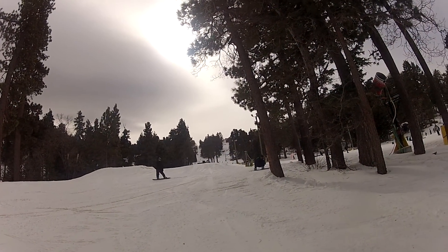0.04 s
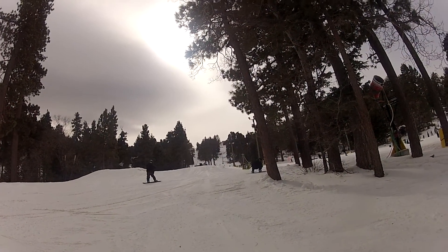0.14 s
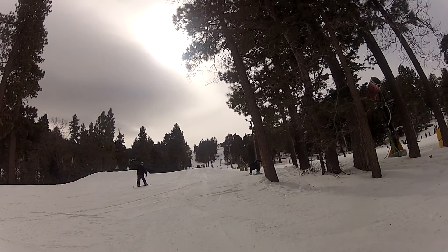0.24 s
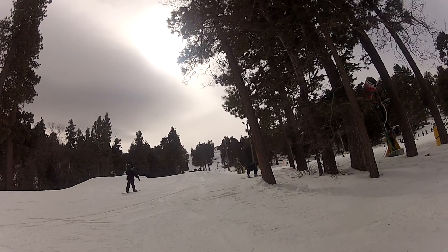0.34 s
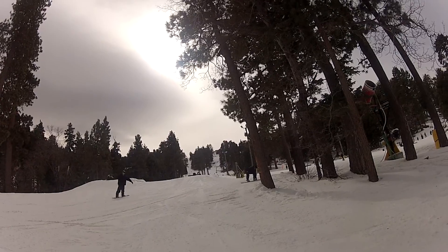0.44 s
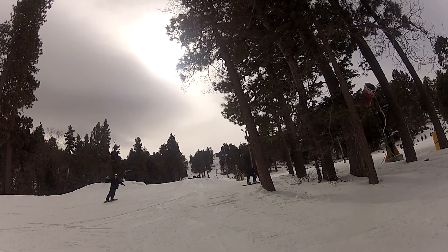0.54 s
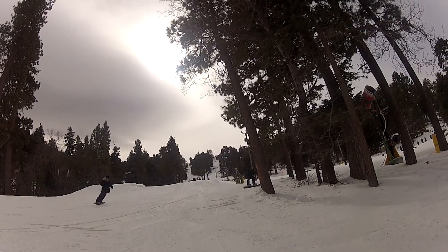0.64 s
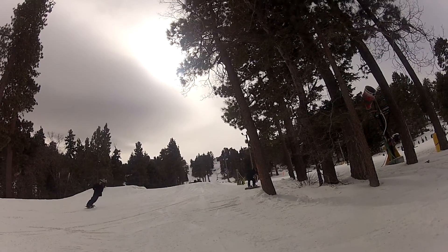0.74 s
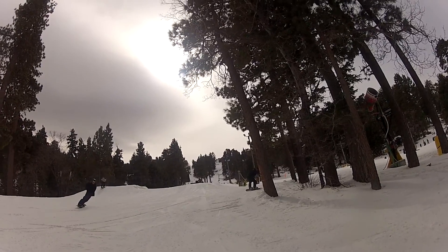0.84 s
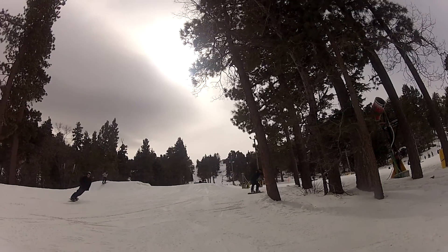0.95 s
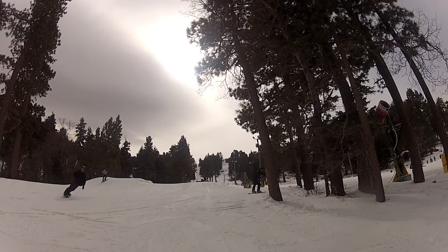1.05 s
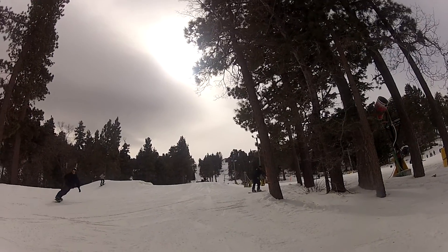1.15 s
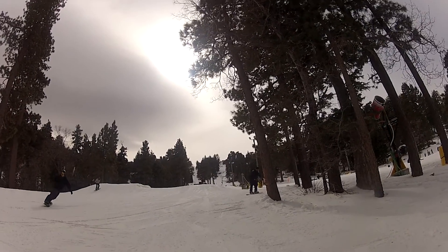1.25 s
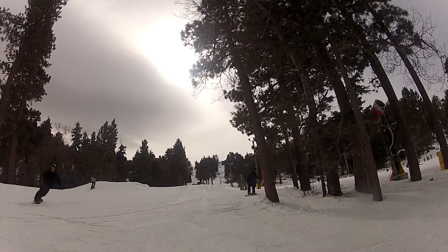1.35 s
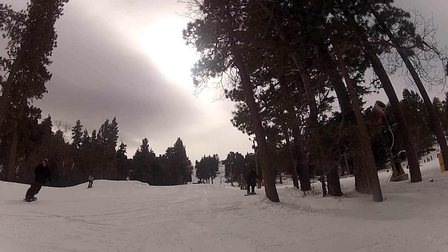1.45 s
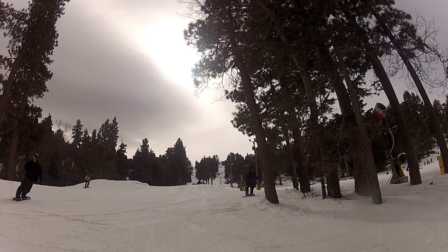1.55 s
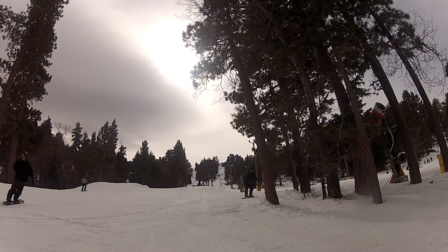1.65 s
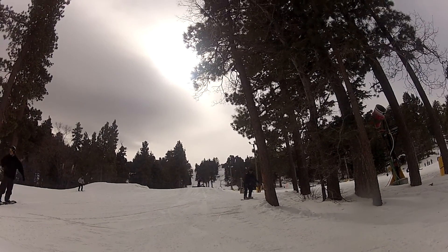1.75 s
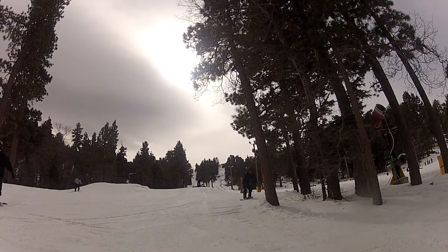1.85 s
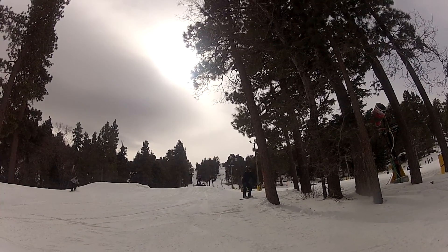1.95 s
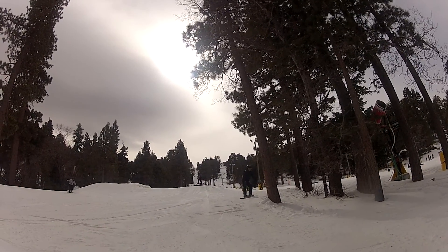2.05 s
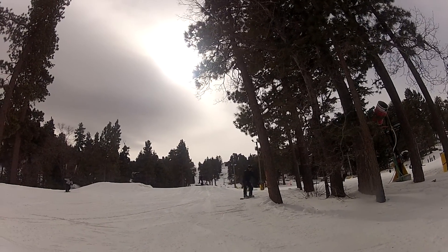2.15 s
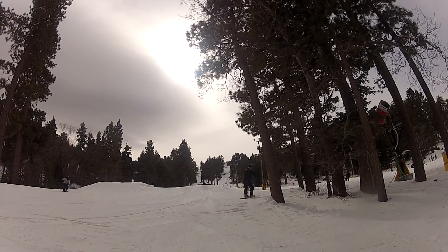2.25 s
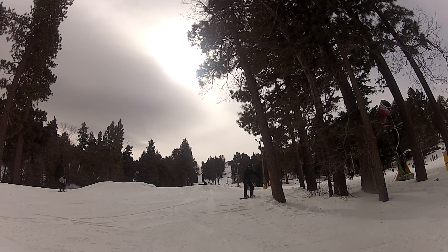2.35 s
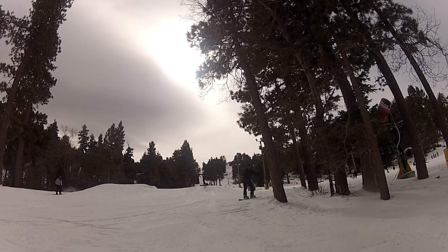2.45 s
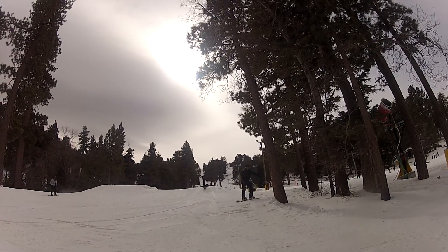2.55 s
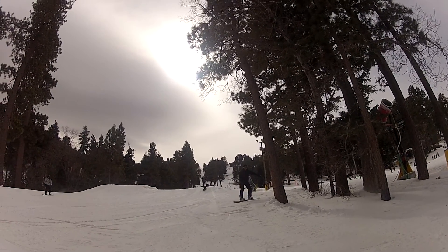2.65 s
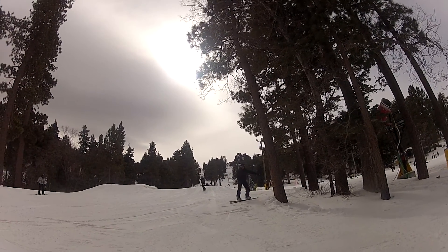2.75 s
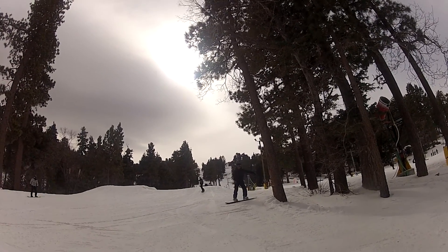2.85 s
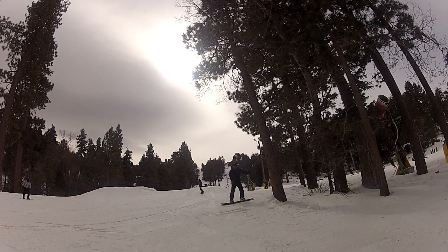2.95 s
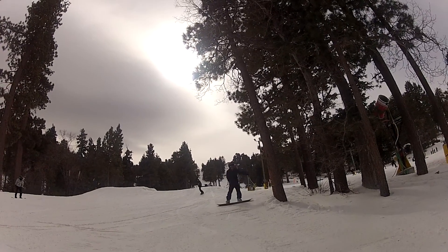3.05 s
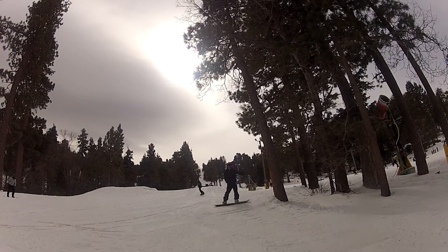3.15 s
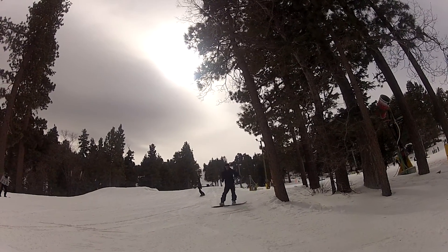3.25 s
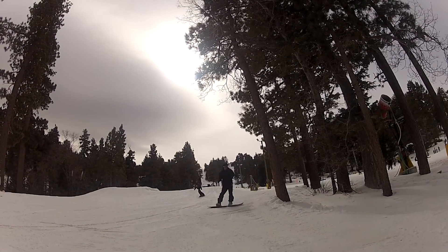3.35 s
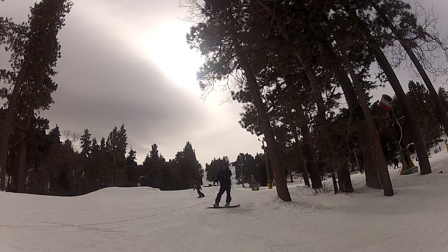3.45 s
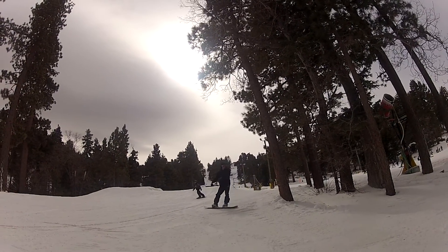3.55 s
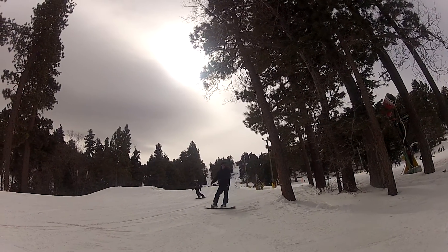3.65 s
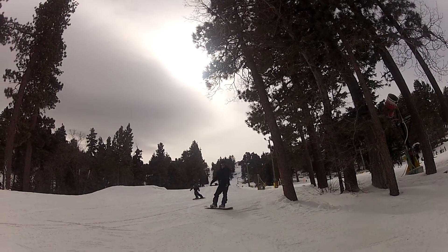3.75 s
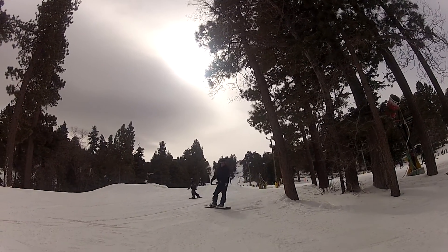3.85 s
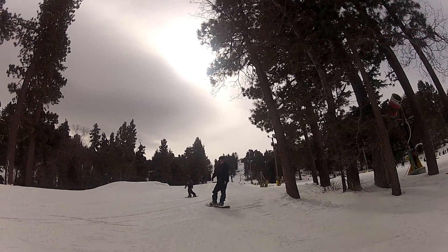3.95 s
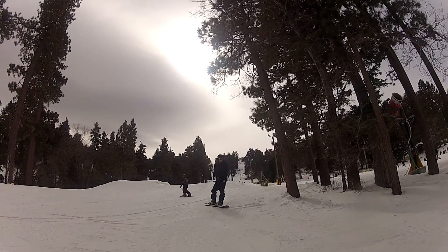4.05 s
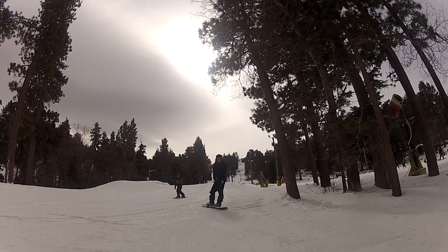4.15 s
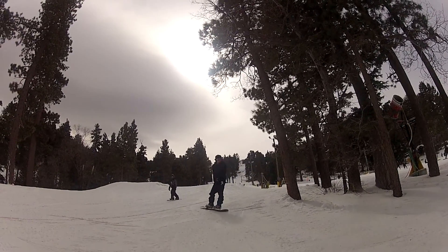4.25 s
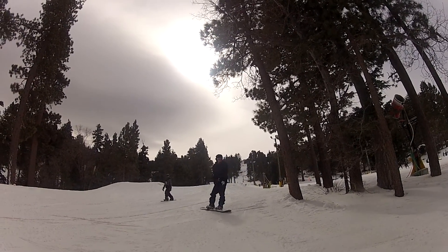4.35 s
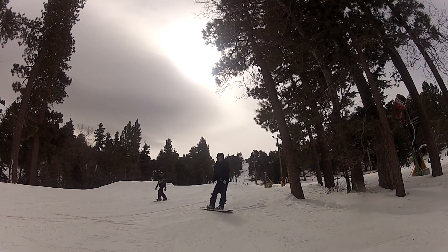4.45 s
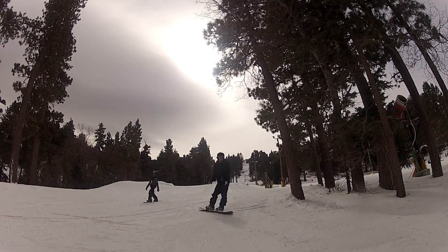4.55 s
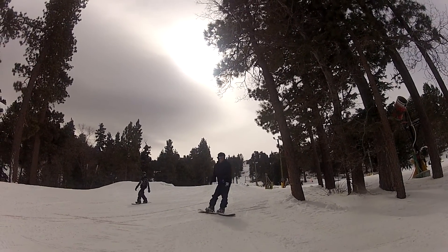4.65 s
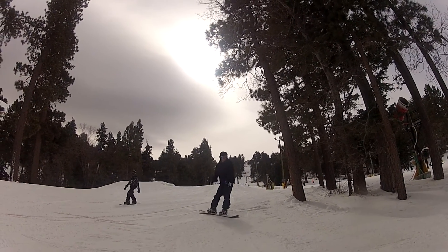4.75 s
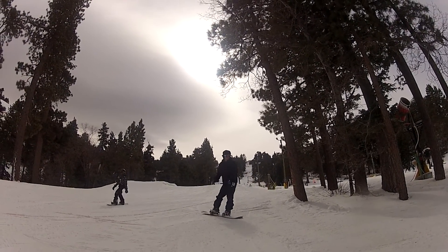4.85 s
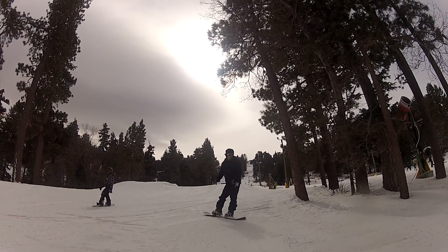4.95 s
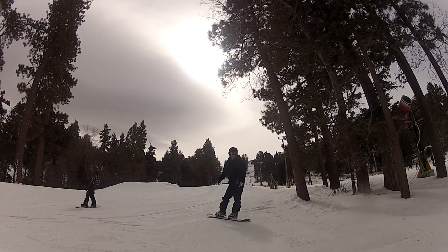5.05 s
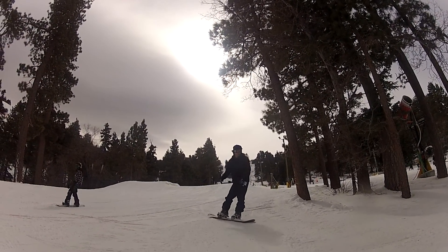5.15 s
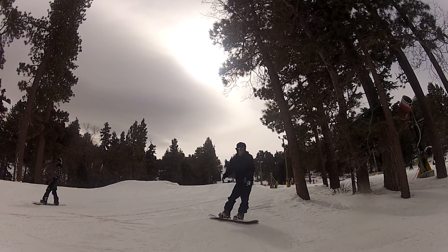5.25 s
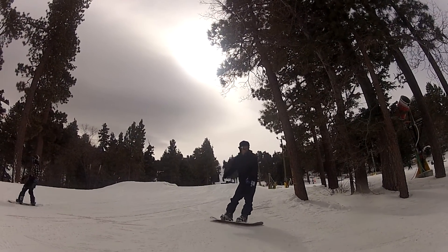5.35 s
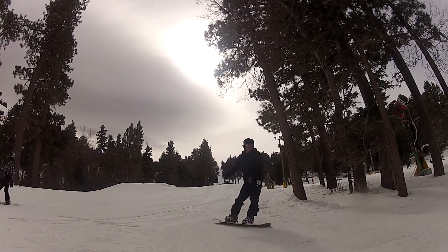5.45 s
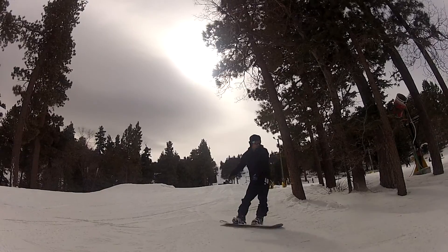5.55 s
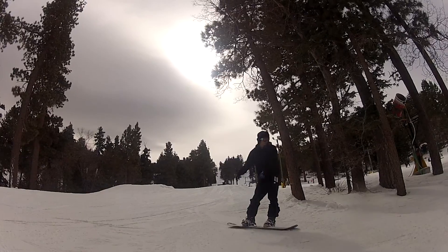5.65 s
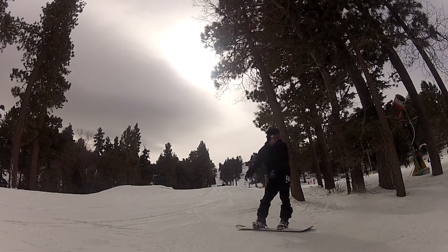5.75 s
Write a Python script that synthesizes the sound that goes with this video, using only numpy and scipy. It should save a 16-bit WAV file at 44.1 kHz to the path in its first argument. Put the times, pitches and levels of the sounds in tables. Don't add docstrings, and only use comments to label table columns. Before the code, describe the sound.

A small sealed camera on a snowy run picks up rubbing and hollow plastic knocks in the first second and a half, the hardest near one second. Then thin snowboard hiss with small crust snaps and icy ticks grows, peaks just before four seconds, and drops to faint flecks, a soft knock and a tiny squeak. Outdoors, dry, boxy and muffled, with a low-grade brittle top.

```python
import sys
import numpy as np
from scipy import signal
from scipy.fft import rfft, irfft
from scipy.io import wavfile
from scipy.ndimage import uniform_filter1d

SR = 44100
rng = np.random.default_rng(int(sys.argv[2]) if len(sys.argv) > 2 else 0)


def transcribe(u):
    v = np.clip(np.atleast_2d(u).T, -1, 1)
    q = np.round(v * 32767).astype(np.int16)
    wavfile.write(sys.argv[1], SR, q)


def amplitude_ratio(level_db):
    exponent = np.asarray(level_db, float) / 20
    return 10 ** exponent


N = 255780

# (frequency [Hz], level [dB], t60 [s])
SHELL_MODES = [(720, 4, 0.037), (835, 8.5, 0.027), (962, 5.5, 0.033), (1112, 6.5, 0.037),
               (1245, 10.5, 0.029), (1370, 6, 0.033), (1454, 1, 0.052), (1560, -13, 0.035)]
# (frequency [Hz], width [Hz], level [dB])
LOWER_PORT_MODES = [(1960, 120, 0), (2130, 170, -7)]
# (frequency [Hz], width [Hz], level [dB])
UPPER_PORT_MODES = [(2430, 170, -5), (2680, 150, -8), (3060, 200, 0), (3480, 260, -6)]
# (frequency [Hz], width [Hz], level [dB])
TOP_PORT_MODES = [(4050, 280, -3), (4850, 320, 0), (5330, 340, 0)]
# (time [s], peak [dB], pitch [Hz], top port re peak [dB])
CRUST_SNAPS = [(0.8818, -51, 1800, -3), (1.0904, -56, 2050, -21), (1.764, -55, 3170, -12),
               (1.895, -55, 1970, -25), (2.2139, -54, 2070, -17), (2.2897, -53, 2050, -13),
               (2.4095, -50, 1860, -9), (2.447, -51, 3350, -7), (2.4806, -49.5, 1900, -13),
               (2.6495, -49.5, 2680, -19), (2.7186, -47, 1830, -20), (2.733, -52, 3320, -22),
               (2.894, -49.5, 3060, -16), (3.082, -55, 2670, -5), (3.1772, -54, 1990, 0),
               (3.208, -52, 1970, -4), (3.283, -48.5, 3080, -11), (2.53, -51.5, 1940, -13),
               (3.415, -52.5, 1980, -22), (3.582, -57, 1940, -24), (3.6331, -60, 1980, -17),
               (3.8305, -47, 2080, -25), (3.9464, -51, 3040, -25), (4.064, -49, 3000, -16),
               (4.4096, -63, 2760, -28), (4.892, -56, 2700, -20), (4.956, -52, 2690, -19)]


def rms_one(x):
    return x / np.sqrt(np.mean(x ** 2) + 1e-20)


def in_time(table):
    s, *columns = np.transpose(table)
    return [np.interp(np.arange(N) / SR, s, c) for c in columns]


def swells(rows, *rest_db):
    t = np.arange(0, N, 64) / SR
    s, length_s, *columns = np.transpose(rows)
    offset = (t[:, None] - s) / np.maximum(length_s, 0.01)
    bells = np.exp(-4 * np.log(2) * offset ** 2) ** 2
    curves = []
    for db, rest in zip(columns, rest_db):
        power = bells @ amplitude_ratio(db) ** 2 + amplitude_ratio(rest) ** 2
        curves.append(np.interp(np.arange(N) / SR, t, 10 * np.log10(power)))
    return curves


def drift(rate_hz):
    r = np.exp(-2 * np.pi * rate_hz * 40 / SR)
    white = rng.standard_normal(N // 40 + 2002)
    slow = signal.lfilter([1], [1, -2 * r, r * r], white)[2000:]
    return np.interp(np.arange(N) / 40, np.arange(len(slow)), rms_one(slow))


def ring(force, modes):
    out = 0
    for hz, db, t60_s in modes:
        r, w = amplitude_ratio(-60 / (t60_s * SR)), 2 * np.pi * hz / SR
        rise, decay = [0, amplitude_ratio(db) * np.sin(w)], [1, -2 * r * np.cos(w), r * r]
        out = out + signal.lfilter(rise, decay, force + 1e-18)
    return out


def peak(x, hz, width_hz):
    r = np.exp(-np.pi * width_hz / SR)
    poles = [1, -2 * r * np.cos(2 * np.pi * hz / SR), r * r]
    return signal.lfilter([(1 - r * r) / 2, 0, (r * r - 1) / 2], poles, x)


def steep(x, hz, width_hz):
    return peak(peak(x, hz, width_hz * 1.55), hz, width_hz * 1.55)


def coloured(points):
    hz, db = np.transpose(points)
    bins_hz = np.arange(N // 2 + 1) * SR / N
    shape = amplitude_ratio(np.interp(np.log(bins_hz + 1), np.log(hz), db))
    return rms_one(irfft(rfft(rng.standard_normal(N)) * shape, N))


def evened(x, span_s, share):
    swell = np.sqrt(uniform_filter1d(x ** 2, int(span_s * SR)) + 1e-12)
    return rms_one(x / swell ** np.clip(share, 0, 1))


def burst(s, length_s, noise):
    decay = np.exp(-np.arange(len(noise)) / SR / max(length_s, 3e-4))
    return round(s * SR), np.r_[2.5, noise[1:]] * decay


def soft(contact_s):
    t = np.arange(1500) / SR / max(contact_s, 5e-5)
    force = t * t * np.exp(-t)
    return force / np.sum(force)


def air():
    # (frequency [Hz], density [dB per Hz])
    air_spectrum = [(60, -8), (150, -6), (300, -7), (600, -16.5), (1000, -20), (1700, -23.5), (3000, -24),
                    (4200, -25), (5500, -28)]
    return amplitude_ratio(-61) * coloured(air_spectrum)


def channel_hiss():
    # (frequency [Hz], density [dB per Hz])
    hiss_spectrum = [(24, -37), (40, -10), (130, -3.5), (680, -14), (3640, -16.5), (5220, -18.5),
                     (5990, -31), (7010, -20), (9000, -25), (11700, -63), (19800, -120)]
    return amplitude_ratio(-77) * coloured(hiss_spectrum)


def handling():
    # (centre [s], length [s], peak [dB])
    gust_rows = [(.09, 0.13, -50.5), (.25, .05, -56), (.52, 0.064, -54), (.62, 0.077, -47.5),
                 (.84, 0.21, -50), (1.0, 0.17, -44), (1.18, 0.053, -48.5), (1.29, 0.11, -46.5),
                 (1.43, 0.043, -55), (1.56, 0.19, -48), (1.81, 0.044, -53), (1.93, 0.25, -54),
                 (2.19, 0.078, -48.5), (2.38, 0.37, -55), (2.82, 0.21, -50), (3.1, .12, -57),
                 (3.24, 0.26, -57), (3.62, 0.038, -48.5), (3.78, 0.05, -47), (3.86, 0.082, -50.5),
                 (4.01, 0.058, -59), (4.42, 0.39, -54), (4.55, 0.05, -50), (4.76, 0.16, -48),
                 (5.0, 0.28, -58.5), (5.24, 0.37, -54), (5.38, 0.12, -50), (5.68, 0.37, -56)]
    # (centre [s], length [s], low wall [dB], upper wall [dB])
    rub_rows = [(.1, 0.19, -70, -64), (.21, 0.041, -54, -65), (.28, 0.071, -54, -59), (.37, 0.1, -50, -54),
                (.57, 0.049, -47.5, -75), (.7, 0.21, -48, -58), (.8, 0.11, -66, -57),
                (.91, 0.08, -63, -45.5), (.99, 0.29, -48, -76), (1.13, 0.042, -46.5, -63),
                (1.23, 0.056, -56, -67), (1.29, 0.036, -51.5, -52.5), (1.48, 0.053, -56, -53),
                (1.57, 0.049, -47.5, -48), (2.19, 0.092, -52.5, -57), (2.3, 0.086, -57.5, -52.5),
                (2.4, 0.21, -56, -57), (2.68, 0.41, -72, -58), (3.12, 0.11, -70, -54.5),
                (3.24, 0.11, -60, -57.5), (3.45, 0.45, -60.5, -64.5), (3.62, 0.046, -60, -76),
                (3.78, 0.077, -64, -66), (3.82, 0.32, -78, -57.5), (4.48, 0.04, -58, -71),
                (4.74, 0.14, -62, -74), (4.92, 0.086, -72, -58.5), (5.26, 0.22, -61.5, -76),
                (5.4, 0.22, -60, -71)]
    sway_db, = swells(gust_rows, -60.5)
    low_db, upper_db = swells(rub_rows, -67, -75)
    rustle_db = 10 * np.log10(amplitude_ratio(upper_db - 10) ** 2 + amplitude_ratio(-71) ** 2)
    white = rng.standard_normal((3, N))
    sway = evened(steep(white[0], hz=31.6, width_hz=16.0), span_s=0.088, share=0.57)
    lumps = white[1] * amplitude_ratio(5.5 * drift(rate_hz=14.4))
    low = evened(steep(lumps, hz=140.3, width_hz=61.4), span_s=0.062, share=1.0)
    upper = steep(lumps, hz=216.6, width_hz=66) + 0.5 * steep(lumps, hz=352, width_hz=72)
    upper = evened(upper, span_s=0.019, share=0.34)
    rustle = rms_one(ring(white[2] * amplitude_ratio(2.5 * drift(rate_hz=40)), SHELL_MODES))
    walls = amplitude_ratio(low_db - 4.0) * low + amplitude_ratio(upper_db - 7.0) * upper
    return amplitude_ratio(sway_db) * sway + walls + amplitude_ratio(rustle_db - 7.0) * rustle


def board():
    # (time [s], edge pressure [dB], lower port re pressure as the base turns away [dB])
    edge_rows = [(0, -73, -4), (.1, -62.5, -6), (.3, -83, 12.5), (.6, -89, 8), (.75, -71.5, 0.5),
                 (1.3, -63, -5.5), (1.74, -71, -4.5), (1.88, -64, -4), (2.12, -65.5, 0), (2.3, -61, -5.5),
                 (2.6, -61.5, -4), (3.572, -59.5, -10), (3.586, -58.5, -4), (3.94, -48, -7.5),
                 (4.095, -51.5, -8.5), (4.125, -65, -5), (5.0, -68.5, -5.5), (5.8, -61, -8.5)]
    spray_s, spray_re_snap_db = 0.099, -15.5
    edge_db, lower_db = in_time(edge_rows)
    spray_db, = swells([(s, spray_s, db + spray_re_snap_db) for s, db, *_ in CRUST_SNAPS], -100)
    press_db = 10 * np.log10(amplitude_ratio(edge_db) ** 2 + amplitude_ratio(spray_db) ** 2)
    top_db = -8.5 - 0.1 * (press_db + 72)
    chatter = 2.26 * drift(rate_hz=40) + 0.21 * drift(rate_hz=45)
    groups = ((LOWER_PORT_MODES, press_db + lower_db),
              (UPPER_PORT_MODES, press_db - 4.0),
              (TOP_PORT_MODES, press_db + top_db))
    out = 0
    for ports, db in groups:
        group = 0
        for hz, width_hz, port_db in ports:
            breaks = rng.random(N) < 6000 / SR
            grains = breaks * rng.standard_normal(N) * amplitude_ratio(chatter + 0.64 * drift(rate_hz=29.0))
            group = group + amplitude_ratio(port_db) * rms_one(steep(grains, hz, width_hz))
        out = out + amplitude_ratio(db - 4.0) * evened(group, span_s=0.013, share=0.32)
    return out


def far_boards():
    # (frequency [Hz], width [Hz])
    far_ports = [(2670, 160), (3420, 265)]
    # (centre [s], length [s], first port [dB], second port [dB])
    pass_rows = [
        (0.0, 0.46, -89, -76),
        (1.13, 0.79, -100, -71.5),
        (2.403, 0.76, -73, -77),
        (2.84, 0.28, -86, -72.5),
        (3.45, 0.8, -81, -80),
        (3.906, 0.28, -85, -62.5),
        (5.098, 1, -74.5, -79),
        (5.8, 0.15, -73, -71),
    ]
    out = 0
    for db, (hz, width_hz) in zip(swells(pass_rows, -80.5, -80.5), far_ports):
        flicker = rng.standard_normal(N) * amplitude_ratio(0.97 * drift(rate_hz=38))
        out = out + amplitude_ratio(db + 0.5) * rms_one(steep(flicker, hz, width_hz))
    return out


def taps():
    # (time [s], peak [dB], pitch of the spot [Hz], contact length [s])
    tap_rows = [(0.298, -52, 1220, 0.0073), (0.304, -45, 1220, 0.0023), (0.345, -55.5, 1190, 0.014),
                (0.452, -44, 1250, 0.0013), (0.454, -50, 1300, 0.0037), (0.726, -53.5, 1360, 0.0041),
                (0.74, -57, 1250, 0.0054), (0.9, -47.5, 1020, 0.008), (0.901, -51, 1470, 0.004),
                (0.936, -63, 1230, 0.0067), (0.949, -49.5, 990, 0.005), (0.987, -55, 1230, 0.025),
                (1.0395, -25, 1300, 0.0028), (1.0445, -29, 970, 0.0041), (1.046, -34, 1440, 0.0034),
                (1.084, -53, 1280, 0.019), (1.172, -56, 1090, 0.022), (1.302, -56, 1250, 0.0078),
                (1.315, -48, 980, 0.008), (1.322, -47, 990, 0.0056), (1.319, -43, 1460, 0.004),
                (1.329, -41.5, 1440, 0.0046), (1.336, -36, 900, 0.0044), (1.004, -55, 1050, 0.006),
                (1.591, -43.5, 1400, 0.0041), (1.595, -60, 1380, 0.0024), (1.594, -46, 920, 0.0028),
                (1.982, -56.5, 1060, 0.0058), (2.376, -52, 1400, 0.0024), (4.515, -60, 1290, .005)]
    grip_damping = 0.65
    glove_cut = signal.butter(4, 1800, fs=SR, output="sos")
    out, rough = np.zeros(N + 4000), rng.standard_normal((len(tap_rows), 4000))
    for (s, db, spot_hz, length_s), noise in zip(tap_rows, rough):
        at, puff = burst(s, length_s, noise)
        modes = [(hz, mode_db - 28 * abs(np.log2(hz / spot_hz)), t60_s * grip_damping)
                 for hz, mode_db, t60_s in SHELL_MODES]
        tap = ring(signal.sosfilt(glove_cut, puff), modes)
        tap = steep(tap, spot_hz, width_hz=380)
        out[at:at + len(puff)] += amplitude_ratio(db - 0.5) * tap / np.max(np.abs(tap))
    return out[:N]


def knocks():
    # (time [s], contact [s], low wall [dB], mid wall [dB], lid [dB])
    negative_rows = [(0.3035, 0.00023, -39.5, -57, -57), (0.453, 0.00012, -59, -33.5, -39.5),
                     (1.008, 0.0005, -42, -38, -65.4), (1.0125, .0005, -39, -40, -62),
                     (0.913, 0.00044, -43, -33.5, -60), (1.042, 0.00027, -26, -13, -15.5),
                     (1.095, 0.0002, -26.5, -57, -43), (1.5938, 0.00011, -35, -24, -37),
                     (1.331, 0.00038, -35, -46, -48), (4.514, 0.00022, -36.5, -30.5, -44),
                     (4.715, 0.00086, -49, -68, -56)]
    # (time [s], contact [s], low wall [dB], mid wall [dB], lid [dB])
    positive_rows = [
        (0.3001, 0.00044, -37, -51, -62),
        (1.0406, 0.00021, -22, -19, -42),
        (1.592, 0.0002, -32, -40, -65),
        (0.346, 0.00053, -38, -54, -62),
        (0.991, 0.00031, -48, -37, -51),
        (.9955, .0004, -48, -35, -61),
        (1.3336, 0.00041, -19.5, -31.5, -28.5),
    ]
    # (frequency [Hz], level [dB], t60 [s])
    low_wall = [(141.6, -4, 0.077), (184, 3, 0.027)]
    mid_wall = [(250.6, 0.0082, 0.052)]
    lid = [(395.5, 0, 0.079)]
    forces = np.zeros((3, N))
    for way, rows in ((-0.91, negative_rows), (0.87, positive_rows)):
        for s, contact_s, *part_db in rows:
            at, push = round(s * SR), soft(contact_s)
            forces[:, at:at + len(push)] += way * amplitude_ratio(part_db)[:, None] * push
    walls = sum(ring(force, modes) for force, modes in zip(forces, (low_wall, mid_wall, lid)))
    return walls - 1.3 * peak(walls, hz=450, width_hz=170)


def jolts():
    # (time [s], direction, level [dB], contact [s])
    jolt_rows = [(0.302, -1, -24.5, 0.0012), (0.962, 1, -35, 0.0021), (0.994, 0.86, -32, 0.0019),
                 (1.051, 0.63, -29, 0.00055), (1.34, -0.79, -26.5, 0.0011), (1.595, -0.95, -42, 0.0015),
                 (4.523, -0.76, -44, 0.002), (4.716, -0.97, -49, 0.0012), (4.77, 1, -43, 0.0017),
                 (5.369, 0.87, -48, 0.0016), (0.369, -0.81, -51, 0.00098)]
    # (frequency [Hz], level [dB], t60 [s])
    mount_mode = [(37.1, 3.5, 0.31)]
    force = np.zeros(N)
    for s, way, db, contact_s in jolt_rows:
        push = soft(contact_s)
        force[round(s * SR):][:len(push)] += way * amplitude_ratio(db) * push
    return np.gradient(ring(force, mount_mode)) * SR / (2 * np.pi * mount_mode[0][0])


def crunch():
    # (time [s], peak [dB], pitch [Hz], top port re peak [dB], length [s])
    crack_rows = [
        (0.304, -51, 1900, -30, 0.0033),
        (0.453, -57, 2450, -34, 0.0013),
        (0.959, -48, 4870, -2, 0.0023),
        (1.0412, -26.5, 3160, -26.5, 0.0013),
        (1.042, -34.5, 3530, -28, 0.0011),
    ]
    # length [s], share of the other ports
    events = [(*row, 0.0054, 0.85) for row in CRUST_SNAPS] + [(*row, 0.6) for row in crack_rows]
    out, rough = np.zeros(N + 1500), rng.standard_normal((len(events), 1500))
    for (s, db, hz, top_db, length_s, others), noise in zip(events, rough):
        at, puff = burst(s, length_s, noise)
        body, top = (rms_one(sum(amplitude_ratio(port_db) * steep(puff, port_hz, width_hz)
                                 for port_hz, width_hz, port_db in ports))
                     for ports in (LOWER_PORT_MODES + UPPER_PORT_MODES, TOP_PORT_MODES))
        snap = rms_one(steep(puff, hz, width_hz=480)) + others * body + amplitude_ratio(top_db + 11.0) * top
        out[at:at + len(puff)] += amplitude_ratio(db + 0.5) * snap / np.max(np.abs(snap))
    return out[:N]


def ticks():
    # (time [s], peak [dB], frequency [Hz], width [Hz])
    tick_rows = [(.4525, -55, 2550, 600), (.7245, -51, 1300, 220), (1.045, -48, 3600, 400),
                 (1.0475, -48, 3000, 200), (2.3765, -49, 5350, 500), (2.3766, -49, 1800, 450),
                 (2.3768, -42.5, 2670, 270), (2.377, -52, 3500, 600), (2.3785, -51, 5000, 450),
                 (2.379, -54, 1450, 400), (3.2015, -57, 3000, 330), (3.2325, -50, 3100, 500),
                 (3.2326, -50, 5000, 450), (3.2327, -54, 4100, 700), (3.2775, -57, 4950, 400),
                 (3.289, -54, 3000, 220)]
    out, click = np.zeros(N + 1500), np.r_[1.0, np.zeros(1499)]
    for s, db, hz, width_hz in tick_rows:
        tick = steep(steep(click, hz, width_hz), hz, width_hz)
        out[round(s * SR):][:len(tick)] += amplitude_ratio(db) * tick / np.max(np.abs(tick))
    return out[:N]


def surges():
    # (centre [s], length [s], pitch [Hz], level [dB])
    surge_rows = [(2.206, 0.049, 1560, -68.5), (2.215, 0.021, 2090, -64), (2.261, 0.022, 1960, -60.5),
                  (2.266, 0.033, 2600, -70), (2.302, 0.022, 2060, -62), (2.31, .03, 2600, -66),
                  (2.341, 0.044, 4840, -66.5), (2.346, 0.039, 1950, -63), (2.423, 0.037, 1480, -66),
                  (2.442, 0.052, 2030, -61.5), (2.446, .012, 3800, -62), (2.464, .012, 2660, -61),
                  (2.49, .03, 5300, -67), (2.448, 0.082, 5740, -68), (2.525, 0.03, 1940, -62.5),
                  (2.565, 0.037, 1990, -62.5), (2.656, 0.019, 3100, -68), (2.693, 0.037, 1980, -66),
                  (2.72, .05, 3050, -64), (2.722, 0.097, 5800, -68), (2.745, 0.028, 2030, -66),
                  (3.595, 0.016, 1950, -61), (3.638, 0.014, 1950, -63), (3.68, .05, 3050, -61.5),
                  (3.715, 0.017, 2970, -65), (3.748, 0.041, 1980, -64), (3.765, .04, 3050, -58),
                  (3.769, 0.024, 4900, -68), (3.835, 0.029, 2010, -56), (3.856, 0.022, 3050, -54),
                  (3.859, 0.044, 4750, -69), (3.877, .035, 1960, -59.5), (3.899, 0.03, 3020, -55),
                  (3.918, 0.056, 4950, -70), (3.947, 0.017, 3030, -52), (3.976, 0.021, 1990, -62),
                  (3.986, 0.023, 3050, -59), (4.034, 0.038, 3150, -62), (4.04, 0.068, 2020, -62.5),
                  (4.047, 0.054, 5000, -64.5), (4.07, .015, 3000, -70), (2.255, .09, 5850, -72),
                  (2.59, .09, 5850, -71), (2.876, 0.055, 1970, -67.5), (2.916, .04, 2980, -65),
                  (3.004, 0.014, 3050, -66.5), (3.093, 0.037, 2710, -63.5), (3.263, 0.03, 1960, -66.5),
                  (3.511, 0.017, 2980, -67), (3.665, 0.05, 4900, -71),
                  (4.35, .06, 2650, -73), (4.412, .012, 2500, -70), (4.425, .03, 3250, -73),
                  (4.64, .06, 2650, -73), (4.82, .06, 1900, -72), (4.893, .02, 2000, -69),
                  (4.9, .025, 2680, -69), (4.905, .02, 3300, -69), (4.955, .012, 3700, -72),
                  (5.005, .02, 2000, -70), (3.9, .4, 5000, -65), (3.61, .05, 3000, -65),
                  (3.61, .05, 2400, -68), (3.61, .05, 4900, -70), (4.95, .15, 5700, -77),
                  (5.3, .18, 5700, -76), (3.15, .16, 5600, -75)]
    rows = surge_rows
    out, t = np.zeros(N), np.arange(-4096, 4096) / SR
    for (s, length_s, hz, db), noise in zip(rows, rng.standard_normal((len(rows), len(t)))):
        band = evened(steep(noise, hz, width_hz=0.092 * hz), span_s=0.0081, share=0.91)
        bell = np.exp(-4 * np.log(2) * (t / max(length_s, 0.005)) ** 2)
        out[round(s * SR) - 4096:][:len(t)] += amplitude_ratio(db) * band * bell
    return out


def squeak():
    # (time [s], frequency [Hz], level [dB])
    hinge_rows = [
        (4.68, 533, -82),
        (4.698, 511, -67),
        (4.734, 597, -68.5),
        (4.772, 535, -67),
        (4.79, 554, -79),
    ]
    hz, db = in_time(hinge_rows)
    t = np.arange(N) / SR
    fade = np.clip(np.minimum(t - hinge_rows[0][0], hinge_rows[-1][0] - t) / 0.018, 0, 1)
    return np.sqrt(2) * amplitude_ratio(db) * fade * np.sin(2 * np.pi * np.cumsum(hz) / SR)


def scene():
    mid = air() + handling() + board() + far_boards() + taps() + knocks()
    mid = mid + jolts() + crunch() + ticks() + surges() + squeak()
    side = channel_hiss()
    return np.array([mid + side, mid - side])


def masked(x):
    # (low edge [Hz], high edge [Hz], rarity of a gap [spreads])
    starved_bands = [(13480, 13760, -.1), (12780, 13060, .2), (13100, 13350, .9), (12450, 12650, 1.1),
                     (11900, 12100, 1.1), (11100, 11350, 1.6)]

    def band(low_hz, high_hz):
        sos = signal.butter(4, (low_hz, high_hz), "band", fs=SR, output="sos")
        return signal.sosfiltfilt(sos, x)

    faint, loud = band(12650, 13450), band(13800, 15200)
    loud_db = 10 * np.log10(uniform_filter1d(loud ** 2, int(0.08 * SR)) + 1e-18)
    hidden = np.clip(loud_db + 72.5, 0, 1)
    blow = uniform_filter1d(faint ** 2, 1000) > amplitude_ratio(-80) ** 2
    gaps = 0
    for low_hz, high_hz, rarity in starved_bands:
        gaps = gaps + band(low_hz, high_hz) * np.clip(4 * (drift(rate_hz=12) - rarity), 0, 1)
    return x - (faint * hidden + gaps * (1 - hidden)) * uniform_filter1d(1.0 - blow, 200)


def top_cut(x):
    return signal.sosfilt(signal.butter(12, 15990, fs=SR, output="sos"), x)


def record(dry):
    up, down, hold_steps = 40, 147, 4
    mid, side = dry.mean(axis=0), (dry[0] - dry[1]) / 2
    guarded = signal.sosfilt(signal.cheby2(10, 30.0, 6170, fs=SR, output="sos"), mid)
    wide = signal.resample_poly(guarded, up * hold_steps, down)
    stairs = np.repeat(wide[::hold_steps], hold_steps)
    held = masked(signal.resample_poly(stairs, down, up * hold_steps)[:N])
    both = np.array([held + side, held - side])
    both = signal.sosfilt(signal.ellip(12, 0.3, 70, 15240, fs=SR, output="sos"), both)
    return top_cut(both)


dry = scene()
out = record(dry)
transcribe(out)
```